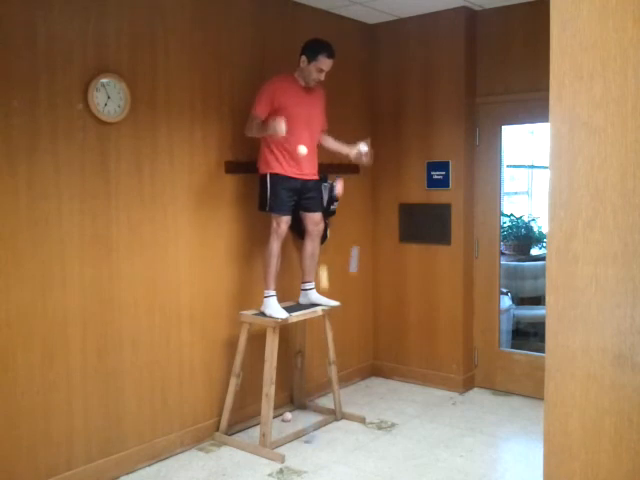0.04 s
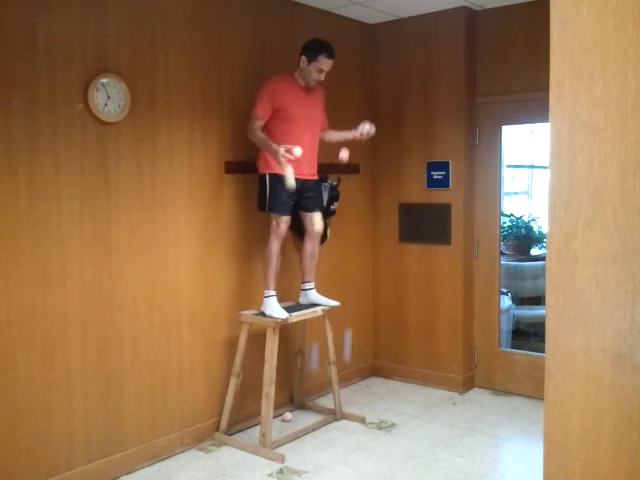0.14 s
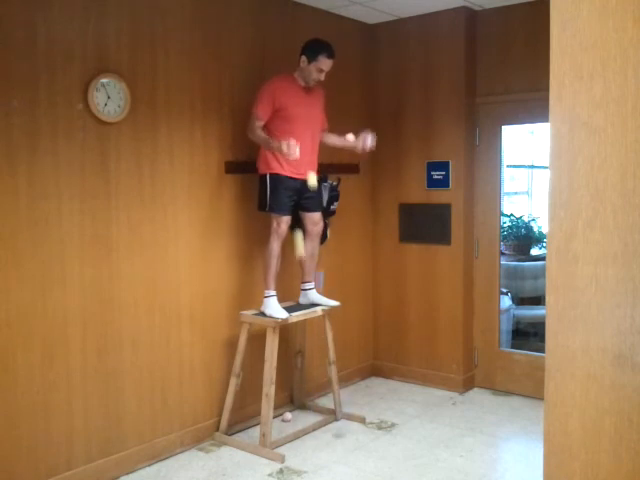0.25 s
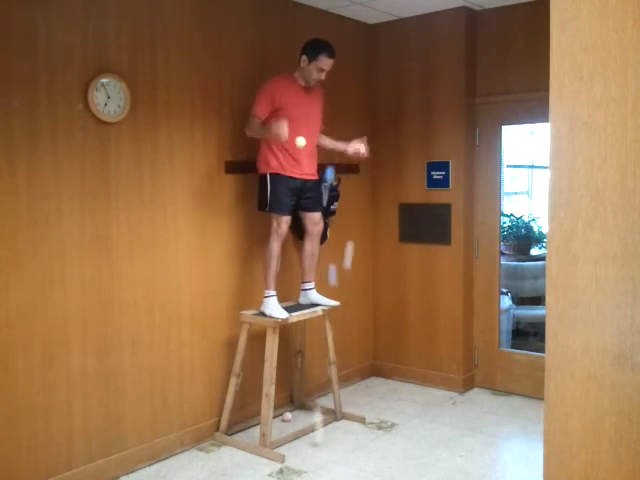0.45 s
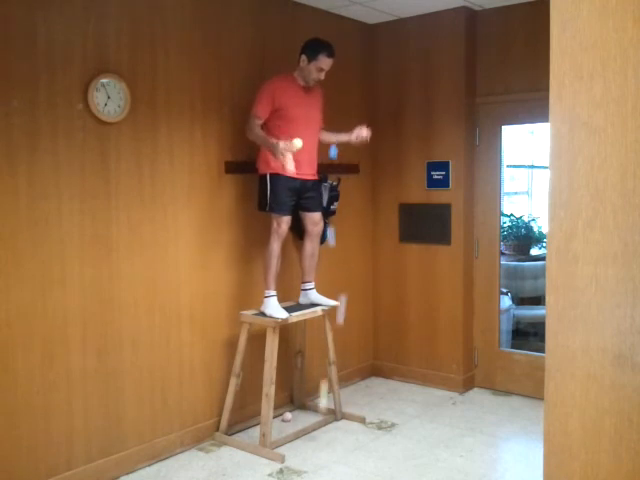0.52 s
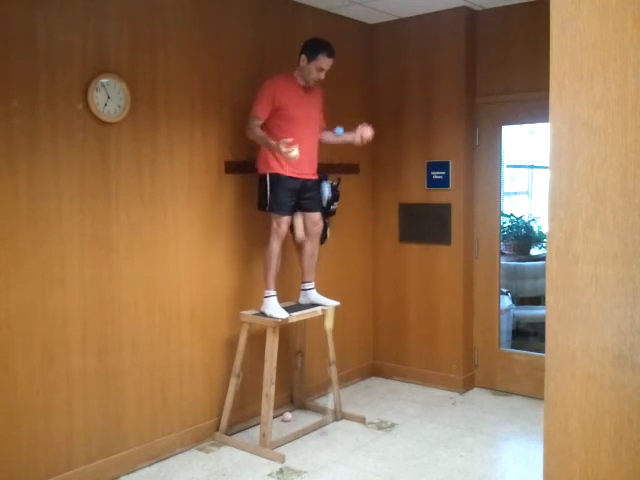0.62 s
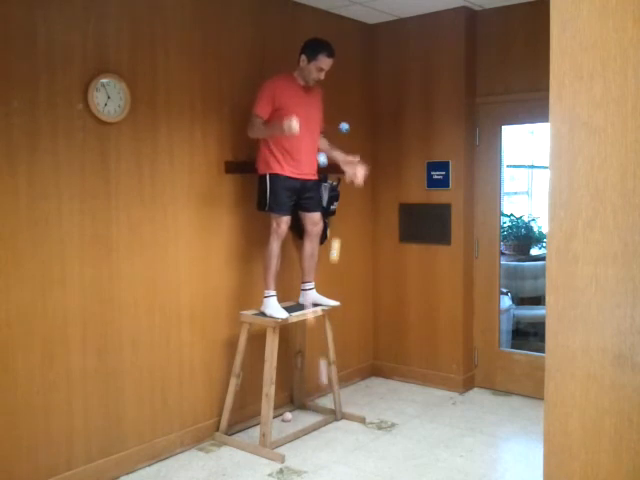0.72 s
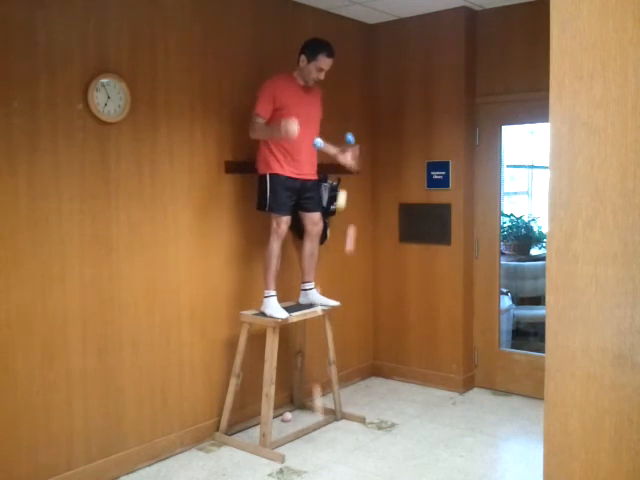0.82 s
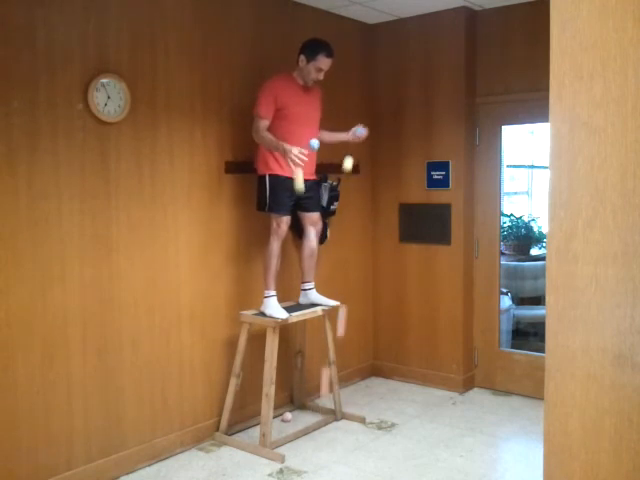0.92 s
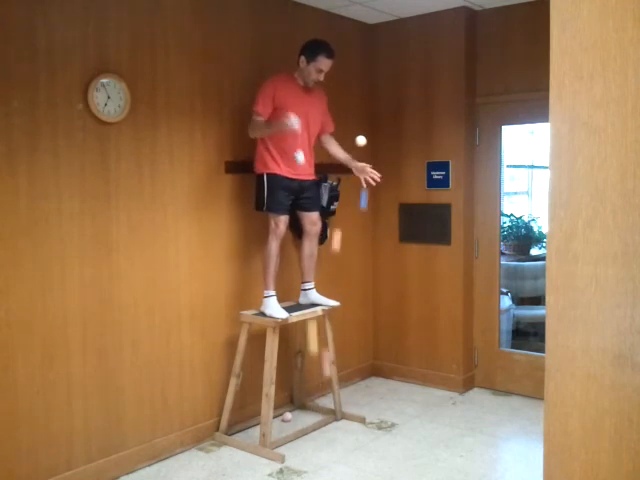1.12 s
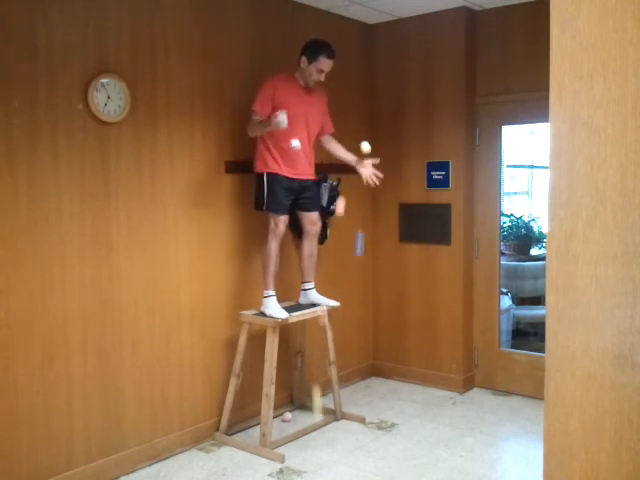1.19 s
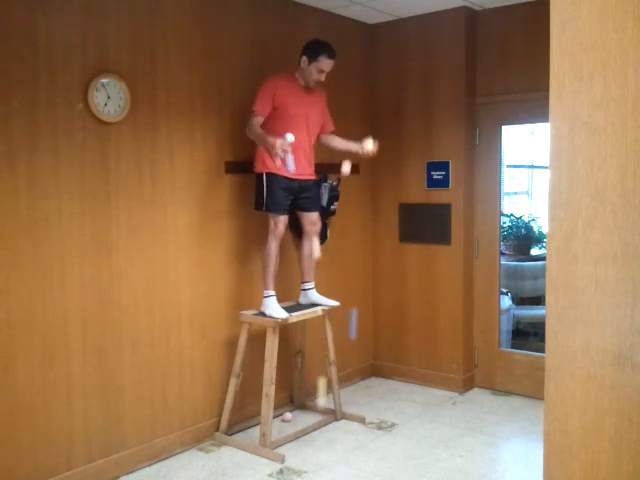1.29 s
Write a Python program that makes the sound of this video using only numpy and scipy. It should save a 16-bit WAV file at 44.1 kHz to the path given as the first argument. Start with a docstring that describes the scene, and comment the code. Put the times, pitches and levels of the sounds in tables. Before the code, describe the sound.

Rubber juggling balls bounce steadily on the floor of a bare, echoing room, a few metres away. A loud wooden knock rings out, followed by a thin squeak, bursts of light rattling and two duller knocks.

```python
"""Rubber juggling balls bounce five times a second in a bare, wood-panelled room, a few metres away.
Each bounce is a low thump with a tick; a few catches slap softly in the palm.
At 0.23 s a hard wooden knock cracks, rings and sets the room booming. A thin squeak follows,
then something light rattles in quick bursts. Two softer, duller knocks come at 0.85 s and 1.19 s."""
import sys
import numpy as np
from scipy import signal
from scipy.fft import rfft, irfft
from scipy.io import wavfile

SR = 44100
rng = np.random.default_rng(int(sys.argv[2]) if len(sys.argv) > 2 else 0)


def store_pcm(level_fs):
    """Save levels as 16-bit WAV."""
    pcm = np.round(np.clip(level_fs, -1, 1) * 32767).astype(np.int16)
    wavfile.write(sys.argv[1], SR, np.atleast_2d(pcm).T)


N = 59535


def amp(db):
    """Decibels to gain."""
    return 10 ** (np.asarray(db) / 20)


def unit(x):
    """Scale to unit energy."""
    return x / np.sqrt(np.sum(x ** 2) + 1e-20)


def read(points, hz):
    """Interpolate a table over log frequency."""
    points_hz, value = np.transpose(points)
    return np.interp(np.log(hz + 1), np.log(points_hz + 1), value)


def add(mix, start_s, sound):
    """Mix in a sound; start_s may be negative."""
    at = round(start_s * SR)
    part, sound = mix[max(at, 0):], sound[max(-at, 0):]
    part[:len(sound)] += sound[:len(part)]


def lowpass(x, hz):
    """First-order treble roll-off."""
    return signal.lfilter(*signal.butter(1, hz, fs=SR), x)


def click(spectrum, size=4096):
    """Minimum-phase click of unit energy."""
    log_gain = np.log(amp(read(spectrum, abs(np.fft.fftfreq(size, 1 / SR)))))
    min_phase = np.exp(np.conj(signal.hilbert(log_gain)))
    return unit(np.fft.ifft(min_phase).real[:size // 2])


def ring(modes):
    """One decaying sine per mode, at random phase."""
    t = np.arange(SR) / SR
    return sum(amp(db) * unit(amp(-60 * t / t60_s) * np.cos(2 * np.pi * (hz * t + rng.random())))
               for hz, db, t60_s in modes)


def taps(echoes=(), first_s=0.00057):
    """Direct arrival plus discrete reflections."""
    out = np.zeros(SR // 10)
    for delay_s, gain in [(first_s, 1), *echoes]:
        add(out, delay_s, np.array([gain], float))
    return out


def reverb_tail(size=256, slow_db=-12):
    """Diffuse field: a fast decay plus a weaker slow one; the bass builds up last."""
    # fast and slow room decay: (frequency [Hz], t60 [s])
    fast_t60 = [(60, 0.85), (200, 0.98), (600, 0.49), (2000, 0.47), (4500, 0.44), (8000, 0.16)]
    slow_t60 = [(60, 0.84), (200, 1), (600, 0.7), (2000, 1.17), (4500, 1.14), (8000, 1.15)]
    # build-up: (frequency [Hz], time constant [s])
    rise_times = [(60, 0.024), (220, 0.026), (500, 0.0037), (8000, 0.01)]
    noise = rng.standard_normal(N)
    for frame in (size * 4, size * 2):  # flatten the short-time spectrum
        bins = signal.stft(noise, SR, nperseg=frame)[2]
        noise = signal.istft(bins / (abs(bins) + 1e-12), SR, nperseg=frame)[1][:N]
    hz, t, bins = signal.stft(noise, SR, nperseg=size)
    fast, slow = (amp(-60 * t / read(table, hz)[:, None]) for table in (fast_t60, slow_t60))
    rise = 1 - np.exp(-t / read(rise_times, hz)[:, None])
    decay = np.hypot(fast, amp(slow_db) * slow)
    return unit(signal.istft(bins * rise * decay, SR, nperseg=size)[1][:N])


def room(sound, early, wet_db):
    """Propagation along discrete early paths and through the diffuse field."""
    response = amp(wet_db) * reverb_tail()
    add(response, 0, early)
    return signal.fftconvolve(sound, response)


def air(rms_db=-52):
    """Steady murmur of air in the room."""
    # noise spectrum: (frequency [Hz], relative density [dB])
    spectrum = [(20, -22.5), (45, -12), (100, -16.5), (170, -11), (260, -15.5), (450, -7.5), (1000, -11),
                (2000, -11), (3300, -10.5), (4900, -10), (6200, -12.5), (8000, -25.5)]
    gain = amp(read(spectrum, np.fft.rfftfreq(N, 1 / SR)))
    noise = irfft(rfft(rng.standard_normal(N)) * gain, N)
    return amp(rms_db) * np.sqrt(N) * unit(noise)


def catches(direct_db=-12):
    """Balls slap softly into the palm, heard mostly through the room."""
    # catches: (time [s], level [dB])
    events = [(-.03, -20.5), (.098, -14.5), (.6715, -15)]
    # slap spectrum: (frequency [Hz], level [dB])
    slap = [(60, -36.5), (300, 2.5), (800, 2), (1600, -5.5), (3000, -14), (4800, -5), (8000, -9)]
    out = np.zeros(N)
    for start_s, db in events:
        add(out, start_s, amp(db) * room(click(slap), amp(direct_db) * taps(), wet_db=0))
    return out


def squeak(start_s=0.322, length_s=0.033, pitch_hz=5750, waver_hz=150, level_db=-3.5):
    """Brief thin tone of wavering pitch."""
    out, t = np.zeros(N), np.arange(0, length_s, 1 / SR)
    waver = np.sqrt(N) * unit(lowpass(rng.standard_normal(N), waver_hz))[:len(t)]
    phase = 2 * np.pi * np.cumsum(pitch_hz + waver_hz * waver) / SR
    tone = unit(np.sin(phase) * np.sin(np.pi * t / length_s))
    add(out, start_s, amp(level_db) * room(tone, taps(), wet_db=-6))
    return out


def chatter(length_s, contacts_per_s=1500, rise_s=0.003, release_s=0.007, sag_db_per_s=71):
    """Burst of small irregular contacts, strongest at first."""
    t = np.arange(SR // 8) / SR
    gate = (1 - np.exp(-t / rise_s)) * np.exp(-np.maximum(t - length_s, 0) / release_s)
    hits = rng.random(len(t)) < contacts_per_s / SR
    return gate * amp(-sag_db_per_s * t) * hits * rng.choice([-1, 1], len(t))


def rattles(direct_db=-1):
    """A light hard thing chatters: dry clacks, a soft thud and a thin high ring."""
    # bursts: (time [s], length [s], clack [dB], ring [dB], thud [dB])
    bursts = [(.3560, 0.057, -0.5, -1, -6.5), (.4450, .045, -0.5, -0.5, -3.5),
              (0.5382, 0.04, 1, -1.5, -11.5), (0.6271, 0.046, -1.5, -2.5, -7),
              (0.714, 0.024, -7.5, -10, -14), (0.98, .05, -10, -10, -12.5), (1.075, .05, -8, -12.5, -13.5)]
    # contact spectra: (frequency [Hz], level [dB])
    clack = [(100, -6.5), (400, -9), (800, -1), (1500, -4.5), (2700, -4), (3500, -6), (5000, -5),
             (6200, -11), (8000, -6.5)]
    thud = [(30, -22.5), (60, -14), (100, -15), (160, -5), (220, -2.5), (320, -7.5), (600, -14),
            (2000, -48), (8000, -64)]
    # modes of the thing: (frequency [Hz], energy [dB], t60 [s])
    modes = [(3138, -18, .12), (3822, -10, .08), (3862, -5, .04), (4705, -12, .12), (4880, -9, .015),
             (5020, -8, .02)]
    out = np.zeros(N)
    for start_s, length_s, clack_db, ring_db, thud_db in bursts:
        contacts = chatter(length_s)
        for spectrum, db in ((clack, clack_db), (thud, thud_db)):
            clicks = signal.fftconvolve(contacts, click(spectrum))
            add(out, start_s, amp(db) * unit(room(clicks, amp(direct_db) * taps(), wet_db=0)))
        jingle = sum(amp(mode[1]) * unit(signal.fftconvolve(contacts, ring([mode]))) for mode in modes)
        add(out, start_s, amp(ring_db) * unit(room(jingle, taps(), wet_db=-4)))
    return out


def knocks(early_db=-16.5, early_cut_hz=580, bass_hz=350, ring_rise_s=0.003, boom_rise_s=0.033):
    """Struck wood cracks, rings and excites the room's low modes; softer blows are duller."""
    # blows: (time [s], level [dB], treble corner [Hz], bass [dB], lowest mode [dB], other modes [dB])
    blows = [(.2337, 14.5, 9170, 1.5, 5.5, 3), (0.8547, 7, 4120, -4, 8.5, 3),
             (1.1894, -0.5, 2890, -2, 9.5, 0.5)]
    # crack spectrum: (frequency [Hz], level [dB])
    spectrum = [(25, -30.5), (45, -21.5), (100, -17.5), (220, -3.5), (330, -6), (480, -5.5), (680, 2.5),
                (900, -1.5), (1300, 0), (2100, -2.5), (2900, -3.5), (3650, -8.5), (4400, 0.5), (5200, -1.5),
                (6500, -5), (8000, -11)]
    # wood and room resonances: (frequency [Hz], energy [dB], t60 [s])
    wood_modes = [(405, -20, .17), (632, -18, .3), (668, -11, .055), (730, -16, .22), (794, -21, .25),
                  (1022, -19, .3), (1302, -20, .25), (1480, -20, .25), (1537, -17, .35), (1863, -19, .4),
                  (1894, -15.5, .4), (2005, -17.5, .4), (2255, -17, .3), (2961, -20, .22), (3822, -25, .5),
                  (4703, -18, .35), (4858, -20, .2), (5561, -24, .3), (5750, -22, .35), (6749, -26, .25)]
    room_modes = [(43.7, -26.5, 1.1), (71.6, -29.5, 1.0), (163.1, -22, 1.5), (222.5, -11, 0.4)]
    # early reflections: (delay [s], relative gain)
    echoes = [(.0037, .8), (.0066, 1.5), (.0079, -1.0), (.0096, 1.1), (.0131, -1.0), (.0160, .9),
              (.0288, .7), (.0362, .8), (.0435, .7)]
    out, t = np.zeros(N), np.arange(SR) / SR
    low_cut = signal.butter(2, early_cut_hz, "highpass", fs=SR)
    early = signal.lfilter(*low_cut, amp(early_db) * taps(echoes))
    ring_rise = 1 - np.exp(-t / ring_rise_s)
    boom_rise = 1 - np.exp(-(t / boom_rise_s) ** 2)
    for start_s, db, corner_hz, bass_db, lowest_db, others_db in blows:
        crack = click(spectrum)
        crack += (amp(bass_db) - 1) * lowpass(crack, bass_hz)  # bass shelf
        wood = amp(lowest_db) * ring(wood_modes[:1]) + amp(others_db) * ring(wood_modes[1:])
        knock = room(crack, early, wet_db=0)
        ringing = room(wood * ring_rise, taps(), wet_db=-10)
        add(out, start_s, amp(db) * lowpass(knock, corner_hz))
        add(out, start_s, amp(db) * lowpass(ringing, corner_hz))
        add(out, start_s, amp(db + bass_db) * ring(room_modes) * boom_rise)
    return out


def bounces(thump_hz=244, width_s=0.0016, skew=0.25, tick_echo_db=-4):
    """The ball squashes and springs back in one low swing; its skin ticks on the floor."""
    # floor impacts: (time [s], thump [dB], tick [dB])
    impacts = [(-.15, -10.5, -20), (.0478, -14.5, -14.5), (.2370, -17, -11), (.4440, -13, -22),
               (.6475, -14, -24), (.8497, -16, -15.5), (1.0603, -15.5, -16.5), (1.2369, -16.5, -13)]
    # rubber tick spectrum: (frequency [Hz], level [dB])
    tick = [(100, -13), (600, 3), (1500, -11), (3000, -9), (4000, -2.5), (4800, 7), (6000, -2.5),
            (8000, -5.5)]
    # wall and ceiling reflections: (delay [s], gain)
    echoes = [(.0070, 0.62), (0.0168, 0.56), (0.0208, 0.63), (0.0261, 0.67)]
    out, t = np.zeros(N), np.arange(-SR // 100, SR // 100) / SR
    phase = 2 * np.pi * thump_hz * t
    thump = unit(np.exp(-0.5 * (t / width_s) ** 2) * (np.cos(phase) + skew * np.sin(phase)))
    scattered = [(delay_s, gain * amp(tick_echo_db)) for delay_s, gain in echoes]
    tick_paths = taps([(0.0006, -1.4), (0.0025, 1)] + scattered)
    for start_s, thump_db, tick_db in impacts:
        add(out, start_s + t[0], amp(thump_db) * room(thump, taps(echoes), wet_db=-1.5))
        add(out, start_s, amp(tick_db) * room(click(tick), tick_paths, wet_db=2))
    return out


def scene(side_air_db=-12.5):
    """All sources, nearly mono, slightly wider in the top treble."""
    # stereo width: (frequency [Hz], side level [dB])
    width = [(60, -33.5), (600, -41), (2000, -30), (5000, -29), (7500, -18.5)]
    mid = bounces() + knocks() + rattles() + catches() + squeak() + air()
    side_gain = amp(read(width, np.fft.rfftfreq(N, 1 / SR)))
    side = irfft(1j * side_gain * rfft(mid), N) + amp(side_air_db) * air()
    return np.array([mid + side, mid - side])


def record(dry):
    """Microphone bass cut, then a steep band limit."""
    low_cut_hz, edge_hz = 38, 8050
    thinned = signal.lfilter(*signal.butter(2, low_cut_hz, "highpass", fs=SR), dry)
    band_limit = signal.firwin(601, edge_hz, window=("kaiser", 8), fs=SR)
    return signal.oaconvolve(thinned, band_limit[None], "same")


dry = scene()
out = record(dry)
store_pcm(out)
```